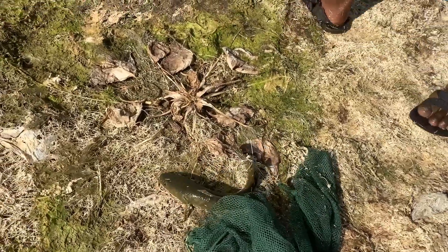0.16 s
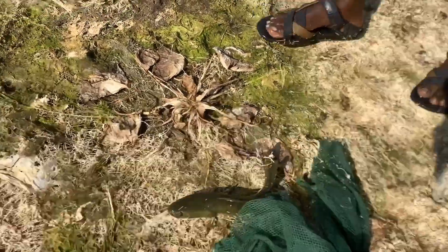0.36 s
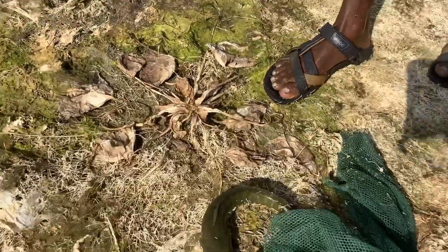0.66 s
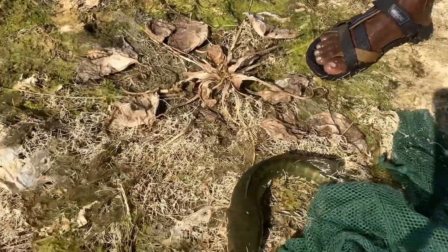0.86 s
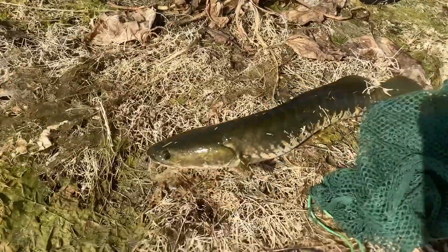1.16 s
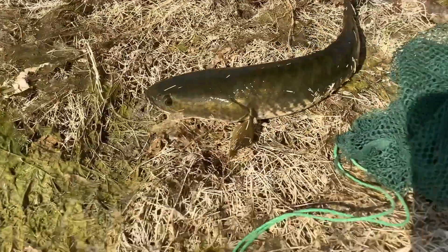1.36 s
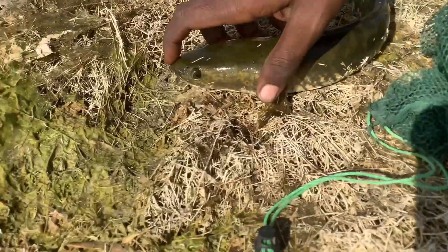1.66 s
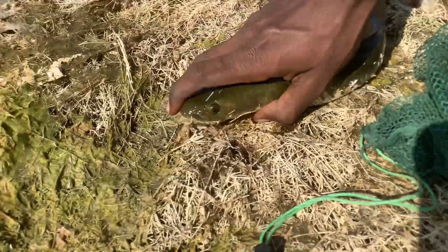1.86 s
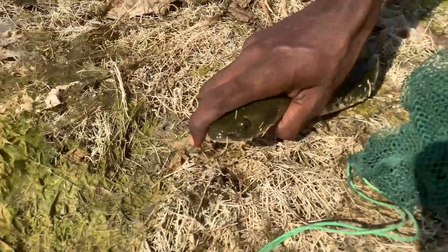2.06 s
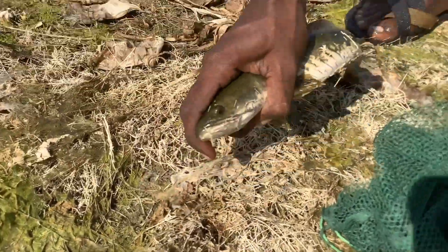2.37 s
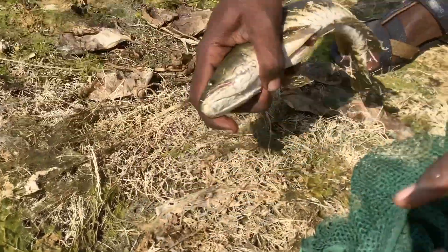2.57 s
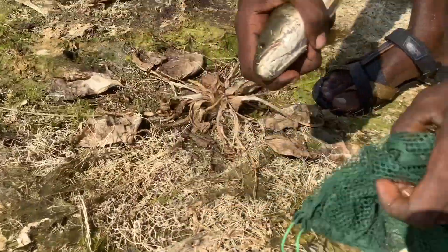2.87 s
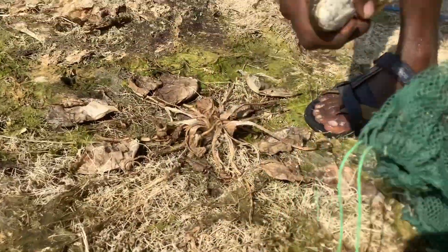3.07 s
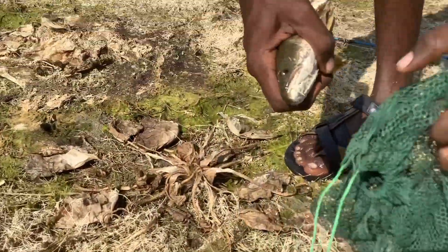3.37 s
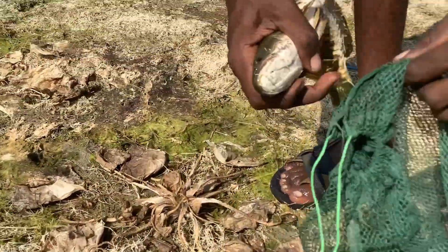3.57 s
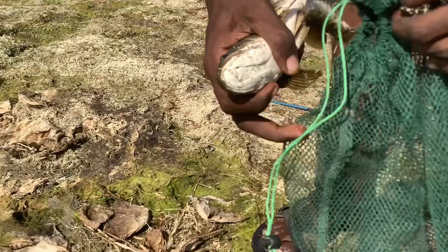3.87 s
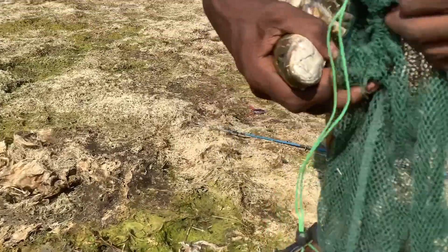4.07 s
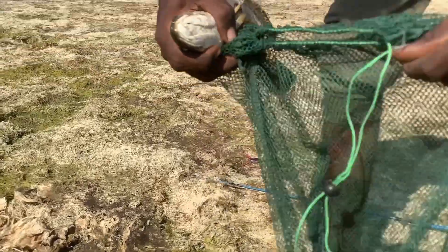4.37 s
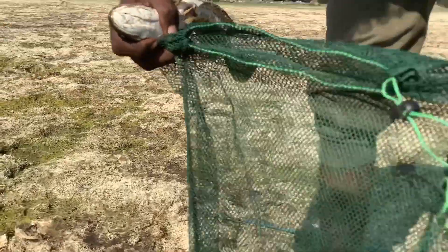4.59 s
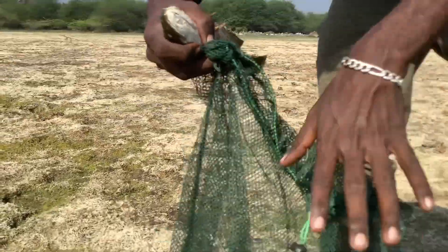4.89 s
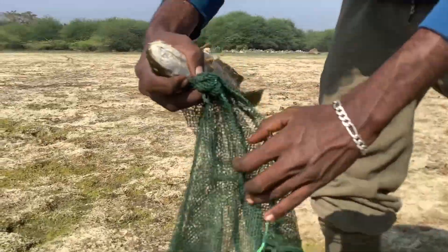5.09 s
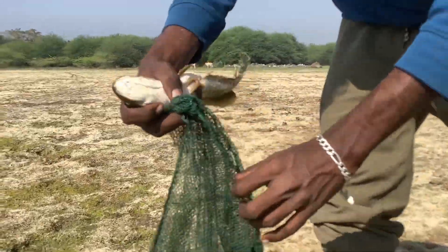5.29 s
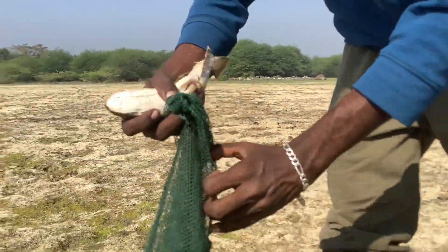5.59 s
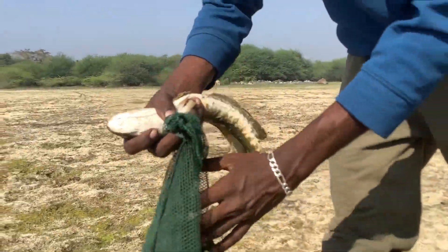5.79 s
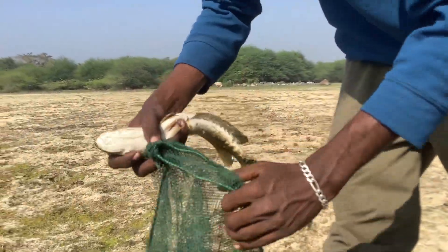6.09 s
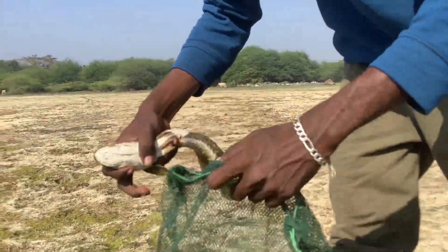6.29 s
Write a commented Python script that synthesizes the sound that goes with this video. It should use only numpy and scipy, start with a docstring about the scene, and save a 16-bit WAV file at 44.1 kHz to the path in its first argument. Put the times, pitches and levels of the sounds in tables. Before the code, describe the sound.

A wet fish thrashes and slaps hard on dry grass, then twitches against rustling netting, with crickets and distant birds behind.

```python
"""A landed fish thrashes on dry grass, slaps the ground (hardest near 0.42 s) and ticks as it slides off a net,
then is picked up and twitches in the hand against the mesh. Slaps are pulses with crushed-fibre grains, friction
is shaped noise, ticks are coloured pulses, pops and clinks are damped tones. Straw and netting rustle all along.
Behind, over light wind noise: a cricket and insect chorus, a low trill at 1.6 s, then chirps from 3.3 s and
rising slurs from 4.6 s, made of gliding sines among fainter twitter."""
import sys
import numpy as np
from scipy import signal
from scipy.fft import rfft, irfft, next_fast_len
from scipy.io import wavfile
from scipy.ndimage import uniform_filter1d, map_coordinates

SR = 44100
rng = np.random.default_rng(int(sys.argv[2]) if len(sys.argv) > 2 else 0)


def master_out(mix):
    """Clip the mix to full scale and print it as 16-bit PCM to the path in sys.argv[1]."""
    frames = np.transpose(np.atleast_2d(mix))
    ceiling = np.clip(frames, -1, 1)
    pcm = np.round(ceiling * 32767).astype(np.int16)
    wavfile.write(sys.argv[1], SR, pcm)


N = 284268


def amp(db):
    """Decibels to gain."""
    return 10 ** (np.asarray(db) / 20)


def unit(x):
    """Scale to rms 1."""
    return x / np.sqrt(np.mean(x ** 2) + 1e-20)


def along(points, hz):
    """Interpolate (Hz, value) points on a log frequency axis."""
    f, v = np.transpose(points)
    return np.interp(np.log(hz + 1), np.log(f + 1), v)


def curves(rows):
    """One value per sample for each column after the time."""
    s, *cols = np.transpose(rows)
    return [np.interp(np.arange(N) / SR, s, c) for c in cols]


def wobble(rate_hz):
    """A smooth random curve with rate_hz knots a second."""
    knots = rng.standard_normal(int(N * rate_hz / SR) + 4)
    return map_coordinates(knots, [np.arange(N) * rate_hz / SR])


def filtered(x, response):
    """Multiply the spectrum of x by a response of frequency."""
    m = next_fast_len(len(x) + SR // 8)
    return irfft(rfft(x, m) * response(np.fft.rfftfreq(m, 1 / SR)), m)[:len(x)]


def coloured(x, spectrum):
    """Filter x by a spectrum of (Hz, dB) points."""
    return filtered(x, lambda hz: amp(along(spectrum, hz)))


def add(track, sound, centre_s):
    """Mix a sound in with its middle at the given second."""
    at = round(centre_s * SR) - len(sound) // 2 + np.arange(len(sound))
    inside = (at >= 0) & (at < len(track))
    track[at[inside]] += sound[inside]


def grains(size, rate, spread_db, share):
    """Tiny snaps of uneven size over smooth rubbing noise; share is the snaps' part of the power."""
    snap = (rng.random(size) < rate / SR) * rng.choice([-1, 1], size)
    snap = snap * amp(spread_db * np.minimum(rng.standard_normal(size), 2))
    share = np.clip(share, 0, 1)
    return np.sqrt(share) * unit(snap) + np.sqrt(1 - share) * rng.standard_normal(size)


def patch(hz, lowest_hz, damping=0.85):
    """A small patch of contact radiates no deep bass and resonates just above its lower limit."""
    r = hz / lowest_hz
    return r ** 3 / np.hypot(1, r) / np.hypot(1 - r ** 2, damping * r)


def tilted(spectrum, tilt_db, pivot_hz=1300):
    """Make a spectrum brighter by tilt_db per octave about the pivot."""
    return [(hz, db + tilt_db * np.log2(hz / pivot_hz)) for hz, db in spectrum]


# Bright upper colour of every contact. Each row: frequency in Hz, gain in dB.
CONTACT_COLOUR = [(4200, -1), (5800, 2.5), (7500, 1.5), (9400, -1), (12000, 6.5)]


def contact(spectrum, crumbly, lowest_hz, rise_s, crumble_s):
    """One clean push inside a short burst of crushed fibres."""
    t = np.arange(-2048, 2048) / SR
    dying = np.exp(-np.abs(t) / np.where(t < 0, rise_s, crumble_s))
    crumbly = np.clip(crumbly, 0, 1)
    burst = grains(len(t), rate=4900, spread_db=3.5, share=0.138) * dying
    burst = coloured(burst / np.linalg.norm(burst), [(400, -4.5), (1500, -0.5)])
    # the push keeps its bass whole; crumbling takes its treble
    push_treble_db = 10 * np.log10(max(1 - crumbly, 1e-2))
    push = coloured(1. * (t == 0), [(500, 0.0019), (1800, push_treble_db)])
    blow = coloured(push + np.sqrt(crumbly) * burst, spectrum)
    return coloured(filtered(blow, lambda hz: patch(hz, lowest_hz)), CONTACT_COLOUR)


# Body and tail slap ground, hand and net. Each row: centre in seconds, relative level in dB,
# brightness in dB per octave, crumbly share 0-1, lower limit of the contact in Hz.
SLAPS = [(0.1325, -21.5, -5.5, 0.6, 150), (0.3035, 0, -2, 0.5, 500), (0.3327, 1, -5, 0.55, 150),
         (0.3678, -1, 1, 0.5, 300), (0.4193, 17, 0, 0.1, 150), (0.4282, 12.5, -0.4, 0.83, 132),
         (1.2761, -12, -1, 0.4, 367), (1.3856, -3.5, 1, 0.26, 416), (2.197, -22.5, -2.5, 0.4, 453),
         (3.039, -15.5, -2, 0.2, 150), (3.7125, -3, -0.5, 0.92, 218), (3.8715, 1.5, 2.5, 0.07, 280),
         (3.8835, 8.5, 2, .7, 298), (3.9617, -5, -0.5, 0.98, 190), (4.833, -5.5, -2.4, 0.98, 170),
         (5.0123, 8, -0.5, 0, 200), (5.1463, -12.5, -5, 0.3, 150), (5.1624, -5.5, -1.5, 0.97, 150),
         (5.545, -7.5, -1.7, 0.93, 222), (5.9016, -3, -3.5, 0.12, 324), (6.1696, -11.5, -0.5, 0.7, 152)]
# A slap of the soft body. Each row: frequency in Hz, gain in dB.
FLESH_COLOUR = [(330, 9), (480, 7), (750, 0.5), (1300, -.5), (3000, -8), (6000, -15), (11500, -26)]


def slaps():
    """Soft-body contacts share one fleshy colour, each with its own brightness."""
    out = np.zeros(N)
    for s, db, tilt_db, crumbly, lowest_hz in SLAPS:
        spectrum = tilted(FLESH_COLOUR, tilt_db)
        add(out, amp(db) * contact(spectrum, crumbly, lowest_hz, rise_s=0.0014, crumble_s=0.0028), s)
    return out


def ring(hz, decay_s):
    """A damped tone that starts softly at the middle of its span."""
    t = np.maximum(np.arange(-SR // 8, SR // 8), 0) / SR
    return (1 - np.exp(-2 * t * hz)) * np.exp(-t / decay_s) * np.sin(2 * np.pi * hz * t)


# Air trapped under wet skin. Each row: start in seconds, pitch in Hz, level in dB.
POPS = [(0.42, 5920, 1), (3.8869, 442, -15.5)]


def pops(cycles=2.05):
    """A pocket of air pops with a short ring; the lower its pitch, the longer it rings."""
    out = np.zeros(N)
    for s, hz, db in POPS:
        add(out, amp(db) * ring(hz, cycles / hz), s)
    return out


def thud(start_s=.4345, pitch_hz=200, level_db=-9, decay_s=0.0052):
    """The body's full weight lands and the soil answers with a few low, damped cycles."""
    out = np.zeros(N)
    add(out, amp(level_db) * ring(pitch_hz, decay_s), start_s)
    return out


def strokes(rows, spectrum, brisk_db):
    """Strokes of friction grains swell and die; rise and fall each span a tenfold change."""
    out, t = np.zeros(N), np.arange(-SR // 4, SR // 4) / SR
    for s, rise_s, fall_s, db, tilt_db in rows:
        stroke = 10 ** (-np.abs(t) / np.where(t < 0, rise_s, fall_s))
        # a brisk, bright stroke catches many fibres at once, a gentle one only single ones
        snaps_per_s = 2200 * amp(db + 2 * tilt_db - brisk_db)
        rub = grains(len(t), rate=snaps_per_s, spread_db=3.0, share=0.63)
        add(out, amp(db) * coloured(stroke * rub, tilted(spectrum, tilt_db)), s)
    return out * amp(3.0)


# The wet body wrenches itself over the soil. Each row: peak in seconds, rise in seconds,
# fall in seconds, relative level in dB, brightness in dB per octave.
THRASHES = [(.307, 0.011, 0.044, -29, 0.5), (.335, 0.042, 0.057, -25.5, 0), (.362, .03, 0.045, -27.5, -0.3),
            (.411, .06, 0.02, -27.5, -0.5)]
# A wet body scraping. Each row: frequency in Hz, gain in dB.
WET_SOIL_COLOUR = [(330, 11.5), (750, 3.5), (1800, -3), (2700, -13), (6000, -15), (11500, -30)]


def thrashes():
    """Wet scraping friction, strong in the lows."""
    return strokes(THRASHES, WET_SOIL_COLOUR, brisk_db=-20.5)


# The body swishes over ground and net. Each row: peak in seconds, rise in seconds,
# fall in seconds, relative level in dB, brightness in dB per octave.
SWISHES = [(.128, 0.04, 0.038, -45.5, 0.8), (.235, 0.0087, 0.18, -43.5, -1), (5.017, 0.01, 0.023, -31, 0),
           (5.042, 0.027, 0.02, -41.5, 4), (5.215, 0.079, 0.019, -45, -.5), (5.375, 0.04, 0.02, -40, 3),
           (5.47, 0.067, 0.03, -33, 2.5), (5.506, 0.044, 0.015, -24.5, 1.4),
           (5.516, 0.02, 0.005, -23.5, 0.5)]
# Skin rubbing. Each row: frequency in Hz, gain in dB.
SKIN_COLOUR = [(330, 11), (1300, -0.5), (4800, -5), (7500, -8), (11500, -22)]


def swishes():
    """Skin friction over ground and net."""
    return strokes(SWISHES, SKIN_COLOUR, brisk_db=-35)


# Grass and mesh are brushed lightly. Each row: peak in seconds, rise in seconds,
# fall in seconds, relative level in dB, brightness in dB per octave.
RUSTLES = [(.345, 0.02, 0.022, -49.5, 3.5), (.572, 0.035, 0.041, -39, -2), (.863, 0.0091, 0.01, -50, 2),
           (.959, 0.013, 0.01, -38.5, -3.5), (1.332, 0.02, 0.031, -47, 1.8), (1.39, 0.044, 0.2, -58, 3),
           (1.935, 0.074, 0.014, -53.5, 0), (2.57, 0.22, 0.1, -61, 1.5), (2.741, .02, 0.015, -49.5, -0.5),
           (2.965, 0.031, 0.1, -49.5, -2), (4.752, 0.019, 0.051, -55.5, 4), (4.886, 0.5, 0.064, -60, 2),
           (6.4, 0.29, 0.29, -65.5, 4)]
# Dry fibres rubbing. Each row: frequency in Hz, gain in dB.
FIBRE_COLOUR = [(330, -3.5), (1300, -3.5), (4800, 2.5), (11500, -5.5)]


def rustles():
    """Light friction of dry fibres."""
    return strokes(RUSTLES, FIBRE_COLOUR, brisk_db=-37.0)


# The fish slides off the mesh. Each row: time in seconds, relative level in dB.
TICKS = [(0.805, -34), (0.827, -39), (0.845, -40), (0.869, -38), (0.887, -38.5), (0.904, -36),
         (0.946, -36.5), (0.961, -31.5), (0.973, -35.5), (0.984, -39), (0.994, -40), (1.004, -45),
         (1.018, -50), (1.028, -44), (1.038, -44)]
# One pluck of the mesh. Each row: frequency in Hz, gain in dB.
TICK_COLOUR = [(150, 3), (450, 26.5), (850, 30.5), (2200, 17.5), (4000, 8), (9000, -17)]


def ticks(ring_hz=800, ring_width_hz=230, ring_t60_s=2.3, ring_db=-5):
    """Little plucks, each a single pulse, leave a faint hollow ring of narrow noise behind."""
    pulses, t = np.zeros(N), np.arange(SR // 2) / SR  # ring is cut at 0.5 s
    for s, db in TICKS:
        pulses[round(s * SR)] = amp(db)
    plucks = coloured(pulses, TICK_COLOUR)
    tail = rng.standard_normal(len(t)) * amp(-60 * t / ring_t60_s)
    ringing = signal.fftconvolve(plucks, tail / np.linalg.norm(tail))[:N]
    hollow = filtered(ringing, lambda hz: np.exp(-((hz - ring_hz) / ring_width_hz) ** 2))
    return plucks + amp(ring_db) * hollow


# Dry stalks break under fish, hand or foot. Each row: centre in seconds, relative level in dB.
BREAKS = [(0.232, -30), (0.511, -19), (1.355, -20.5), (1.455, -17), (2.879, -16.5), (2.9877, -19),
          (3.228, -29.5), (3.6858, -10), (4.897, -17.5), (5.194, -19.5), (5.332, -23.5)]
# A breaking stalk. Each row: frequency in Hz, gain in dB.
STALK_COLOUR = [(330, 3), (1300, -4), (4800, 1.5), (11500, -8)]


def breaks():
    """Stalks give way with a thin, crumbly crack."""
    out = np.zeros(N)
    for s, db in BREAKS:
        crack = contact(STALK_COLOUR, crumbly=0.65, lowest_hz=150, rise_s=0.00093, crumble_s=0.0026)
        add(out, amp(db) * crack, s)
    return out


def snaps(count=700, pitch_hz=8500, spread_db=3.0, cycles=3.5):
    """Single dry stalks tick, each ringing for a few cycles at its own pitch; rms 1."""
    t = np.arange(256) / SR
    at = rng.integers(0, N - len(t), (count, 1)) + np.arange(len(t))
    tune, size = rng.standard_normal((count, 2)).T[:, :, None]
    hz = pitch_hz * np.exp(0.63 * np.tanh(tune))
    dying = np.exp(-t * hz / cycles)
    rings = amp(spread_db * np.minimum(size, 2)) * dying * np.sin(2 * np.pi * hz * t)
    return unit(np.bincount(at.ravel(), rings.ravel(), N))


# Level course of the stirring. Each row: time in seconds, straw in relative dB, crackle in relative dB.
STIR_LEVELS = [(0.0, -52, -70), (0.54, -48.5, -63.5), (0.77, -46.5, -64.5), (1.17, -50.5, -64),
               (1.98, -59, -72), (4.33, -58.5, -76.5), (4.84, -56.5, -67), (6.12, -60, -78),
               (6.3, -51.5, -77)]
# Straw rubbing. Each row: frequency in Hz, gain in dB.
STRAW_COLOUR = [(30, 0), (200, 13.5), (600, 2.5), (1200, -1), (5000, -3), (7000, -17.5), (16000, -26.5)]
# Fine crackle. Each row: frequency in Hz, gain in dB.
CRACKLE_COLOUR = [(2000, -18), (5000, 0), (9000, 7.5), (12000, 3), (16000, -35)]


def stirring():
    """Dry grass and netting keep shifting under fish, feet and hands: rubbing, fizz and stalk ticks."""
    straw_db, crackle_db = curves(STIR_LEVELS)
    fidget_db = 1.7 * wobble(30)
    rubbing = unit(coloured(grains(N, rate=180, spread_db=6.0, share=0.16), STRAW_COLOUR))
    straw = amp(straw_db + fidget_db - 6.0) * rubbing
    fizz = unit(coloured(grains(N, rate=610, spread_db=2.5, share=0.4), CRACKLE_COLOUR))
    clumps = unit(amp(3.0 * wobble(160)))
    stalks = coloured(snaps(), [(12000, -1.0), (16000, -4)])
    return straw + amp(crackle_db + fidget_db) * (clumps * fizz + stalks)


def dispersed(x, cycles=1.936, knee_hz=90):
    """Low tones arrive up to two cycles late, so every click falls in pitch like a wet 'tchup'."""
    return filtered(x, lambda hz: np.exp(-2j * np.pi * cycles * np.log1p(hz / knee_hz)))


# Colour of slaps, breaks, ticks and rubbing. Each row: frequency in Hz, gain in dB.
HANDLING_COLOUR = [(30, -27), (90, -3), (210, 2), (450, -1.27), (2400, -1), (3150, -2), (4300, 2),
                   (5800, 0), (7500, 0), (9500, 3.5), (12000, 1), (16000, -11.5)]


def handling():
    """Contacts and friction share one colour; with the stirring they are dispersed."""
    rubbing = swishes() + rustles() + thrashes()
    close = coloured(slaps() + breaks() + ticks() + rubbing, HANDLING_COLOUR)
    return dispersed(close + stirring())


# Cord bead and bracelet links. Each row: start in seconds, pitch in Hz, level in dB.
CLINKS = [(3.6862, 5400, -30.5), (3.871, 5450, -29), (6.227, 5740, -42.5), (6.288, 13200, -50),
          (6.335, 12700, -45)]


def clinks(decay_s=0.0025):
    """Small hard things each ring on one high tone for a few milliseconds."""
    out = np.zeros(N)
    for s, hz, db in CLINKS:
        add(out, amp(db) * ring(hz, decay_s), s)
    return out


# Shifting feet and hands. Each row: centre in seconds, relative level in dB.
BUMPS = [(0.829, -43), (2.336, -46), (3.44, -41.5), (4.169, -44), (6.038, -44)]


def bumps(pitch_hz=90, width_hz=45, length_s=0.038):
    """Dull swells of narrow low noise."""
    out, t = np.zeros(N), np.arange(-SR // 8, SR // 8) / SR
    for s, db in BUMPS:
        noise = rng.standard_normal(len(t))
        low = filtered(noise, lambda hz: np.exp(-((hz - pitch_hz) / width_hz) ** 2))
        low = low * np.exp(-(t / length_s) ** 2)
        add(out, amp(db + 3.5) * low / np.abs(low).max(), s)
    return out


# Light wind. Each row: frequency in Hz, gain in dB.
WIND_COLOUR = [(20, -50), (35, -27), (55, 5), (85, 1), (150, 4), (200, -2), (260, -12), (600, -15),
               (1000, -31.5), (2500, -42.5)]


def wind(level_db=-53.5):
    """Light air rumbles in uneven puffs of low noise."""
    return amp(level_db + 2.6 * wobble(11)) * unit(coloured(rng.standard_normal(N), WIND_COLOUR))


# Level of the far chorus. Each row: time in seconds, level in dB.
CHORUS_LEVELS = [(2.5, -81.5), (4.0, -71.5)]
# The far chorus. Each row: frequency in Hz, gain in dB.
CHORUS_COLOUR = [(3000, -31), (5200, -2), (6400, -36.5), (7500, -9), (8700, 5), (9700, -17), (16000, -40)]
# Level of the cricket. Each row: time in seconds, level in dB.
CRICKET_LEVELS = [(0, -64), (1, -66), (1.7, -90), (5.45, -75.5), (5.9, -65.5), (6.45, -64)]


def insects(trill_hz=7860, trill_spread_hz=160, chirps_per_s=8.453, first_s=.495, duty=.78):
    """A far chorus of noise that grows, and a cricket gating a rough, high tone at a steady rate."""
    t = np.arange(N) / SR
    chorus = amp(curves(CHORUS_LEVELS)[0]) * unit(coloured(rng.standard_normal(N), CHORUS_COLOUR))
    roughness = amp(2.5 * wobble(300) + 1.5 * wobble(8))
    pitch_hz = trill_hz + trill_spread_hz * wobble(1200)
    tone = unit(roughness * np.sin(2 * np.pi * np.cumsum(pitch_hz) / SR))
    gate = uniform_filter1d(1. * ((t - first_s) * chirps_per_s % 1 < duty), size=500)
    return chorus + amp(curves(CRICKET_LEVELS)[0]) * gate * tone


def whistle(pitch_hz):
    """A pure note along a pitch curve, with soft ends."""
    return signal.windows.tukey(len(pitch_hz), .35) * np.sin(2 * np.pi * np.cumsum(pitch_hz) / SR)


def droop(u, crest=0.34):
    """Pitch drop along a note (u 0-1): 0 at the crest, 1 at the end."""
    return ((u - crest) / (1 - crest)) ** 2


def trill(start_s=1.63, length_s=.43, top_hz=738, sink_hz=55, level_db=-59,
          rate_hz=37, depth=.6, rise_s=0.1):
    """A far bird's low, hoarse note, pulsed quickly, swells in, wavers and sinks towards its end."""
    out, t = np.zeros(N), np.arange(int(length_s * SR)) / SR
    hoarse, waver_hz = amp(2.5 * wobble(90)[:len(t)]), 20 * wobble(110)[:len(t)]
    roll = (1 + depth * np.sin(2 * np.pi * rate_hz * t)) * np.minimum(t / rise_s, 1)
    pitch_hz = top_hz - sink_hz * droop(t / length_s) + waver_hz
    add(out, amp(level_db) * hoarse * roll * whistle(pitch_hz), start_s + length_s / 2)
    return out


# The farthest birds. Each row: time in seconds, relative level in dB.
TWITTER_LEVELS = [(2.0, -81), (3.4, -70.5), (4.5, -67.5), (6.4, -78)]


def twitter(count=150, centre_hz=3900, length_s=.032):
    """Many tiny chirps at random times, each gliding from its own pitch."""
    out, u = np.zeros(N), np.linspace(-1, 1, int(length_s * SR))
    for when, tune, glide, size in rng.uniform(-1, 1, (count, 4)):
        pitch_hz = centre_hz * np.exp(.35 * tune + .12 * glide * u - .05 * u ** 2)
        add(out, amp(3.3 * size) * whistle(pitch_hz), (when + 1) / 2 * N / SR)
    return amp(curves(TWITTER_LEVELS)[0]) * out


# A songbird repeats one rising slur. Each row: start in seconds, relative level in dB.
SLURS = [(4.636, -60.5), (4.945, -73), (5.245, -71), (5.572, -66.5), (5.9, -70.5), (6.232, -72)]
# Chirps, each one bent glide. Each row: start in seconds, length in seconds, first pitch in Hz,
# middle pitch in Hz, last pitch in Hz, relative level in dB.
CHIRPS = [(.098, 0.07, 6400, 7400, 6500, -68), (3.313, 0.031, 2700, 3190, 3050, -64),
          (3.346, 0.026, 3930, 3160, 2670, -59.5), (3.395, 0.033, 5100, 5600, 5400, -71),
          (3.485, 0.048, 3410, 3000, 2700, -66), (3.491, 0.029, 3950, 4350, 4400, -65),
          (3.522, 0.023, 4200, 5360, 5800, -58.5), (3.541, 0.031, 4900, 4530, 4300, -59),
          (3.567, 0.041, 4450, 5000, 4470, -59.5), (3.89, 0.068, 5150, 5650, 5260, -67),
          (4.01, 0.044, 2740, 3060, 2820, -63.5), (4.055, 0.05, 3850, 3450, 3160, -65.5),
          (4.094, 0.028, 2580, 2900, 2950, -61), (4.077, 0.086, 7800, 7170, 7600, -74),
          (4.155, .11, 7650, 7050, 5450, -70.5), (4.203, .035, 5780, 5100, 4700, -68),
          (4.858, 0.093, 3700, 4730, 4230, -69), (5.16, 0.072, 4400, 3660, 3300, -66),
          (5.647, .035, 4770, 5370, 5250, -67), (5.695, .085, 5000, 5570, 5150, -69),
          (5.785, 0.033, 5400, 5200, 4720, -65), (5.845, .048, 4900, 5550, 5200, -66),
          (5.918, 0.1, 4200, 5800, 4500, -68.5)]
# Nearly level whistles of farther birds. Each row: start in seconds, length in seconds,
# highest pitch in Hz, relative level in dB.
WHISTLES = [(1.46, 0.14, 2595, -72), (1.805, 0.043, 1910, -65.5), (3.24, 0.18, 1497, -72),
            (5.53, 0.21, 2570, -65)]


def birds(slur_s=.115, slur_from_hz=2720, slur_to_hz=4970, slur_curve=1.1, whistle_droop_hz=81,
          tree_echo_s=.047, tree_echo_db=-11, scatter_t60_s=1.2, scatter_db=-9.5):
    """Distant sine notes waver, echo off the tree line and scatter a little over the field."""
    out = twitter()
    drift, flutter = 1 + .009 * wobble(170), amp(2.8 * wobble(90))

    def course(length_s):
        return np.linspace(0, 1, int(length_s * SR))

    notes = []
    for s, db in SLURS:
        notes.append((s, db, slur_from_hz + (slur_to_hz - slur_from_hz) * course(slur_s) ** slur_curve))
    for s, length_s, first_hz, middle_hz, last_hz, db in CHIRPS:
        bend = np.polyfit([0, .5, 1], [first_hz, middle_hz, last_hz], 2)
        notes.append((s, db, np.polyval(bend, course(length_s))))
    for s, length_s, hz, db in WHISTLES:
        notes.append((s, db, hz - whistle_droop_hz * droop(course(length_s))))
    for s, db, pitch_hz in notes:
        at = np.minimum(int(s * SR) + np.arange(len(pitch_hz)), N - 1)
        out[at] += amp(db) * flutter[at] * whistle(pitch_hz * drift[at])
    echo = np.pad(out, (round(tree_echo_s * SR), 0))[:N]
    # the trill gets scatter but no tree echo
    calls = out + amp(tree_echo_db) * echo + trill()
    t = np.arange(SR // 2) / SR  # scatter is cut at 0.5 s
    tail = rng.standard_normal(len(t)) * amp(-60 * t / scatter_t60_s)
    return calls + amp(scatter_db) * signal.fftconvolve(calls, tail / np.linalg.norm(tail))[:N]


def scene():
    """Close handling over the open field."""
    close = handling() + pops() + thud() + clinks() + bumps()
    field = wind() + insects() + birds()
    return (close + field)[None]


def record(dry, top_hz=16100):
    """Nothing is kept above the band limit."""
    return filtered(dry[0], lambda hz: hz < top_hz)[None]


dry = scene()
out = record(dry)
master_out(out)
```